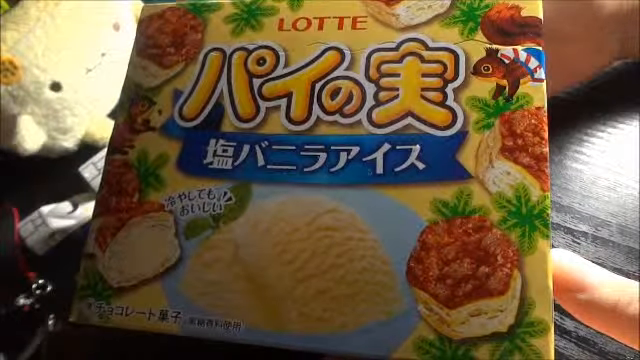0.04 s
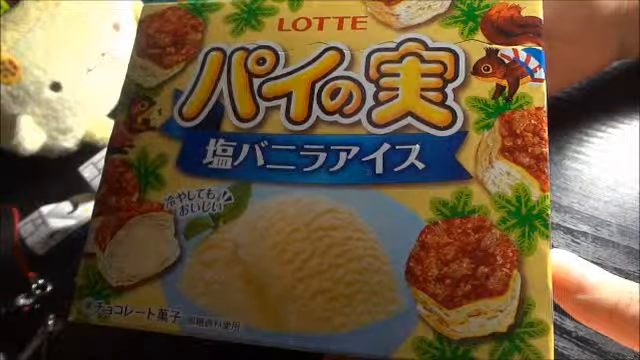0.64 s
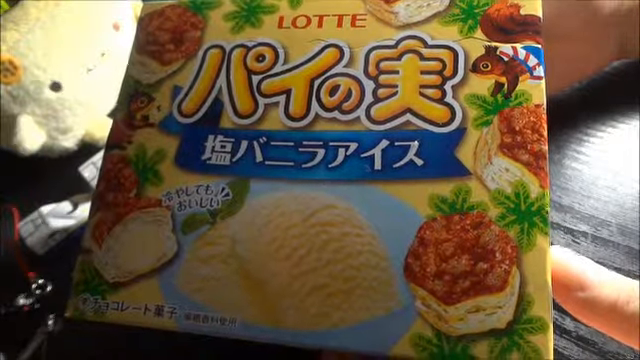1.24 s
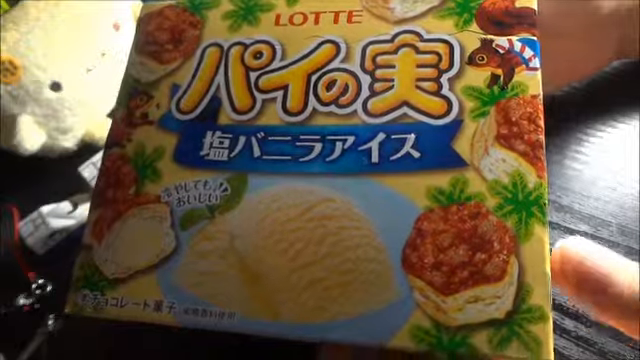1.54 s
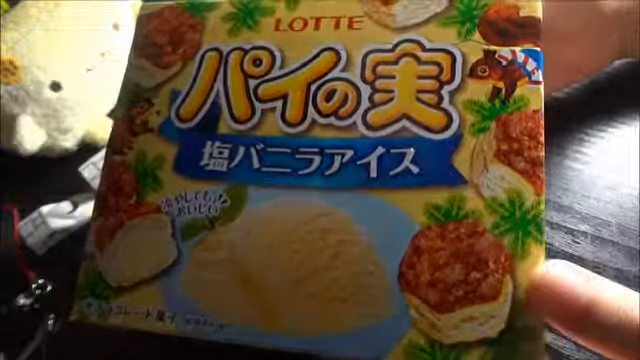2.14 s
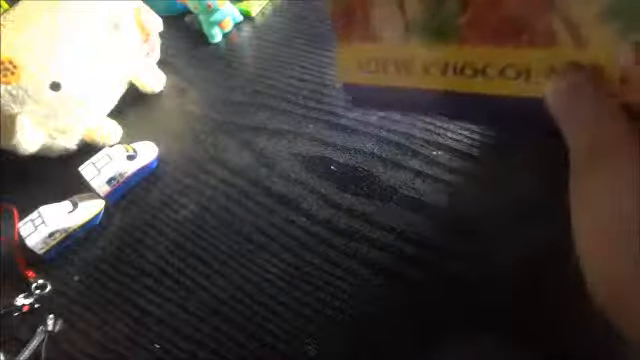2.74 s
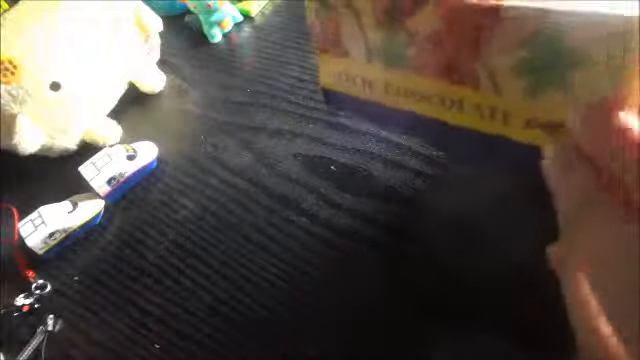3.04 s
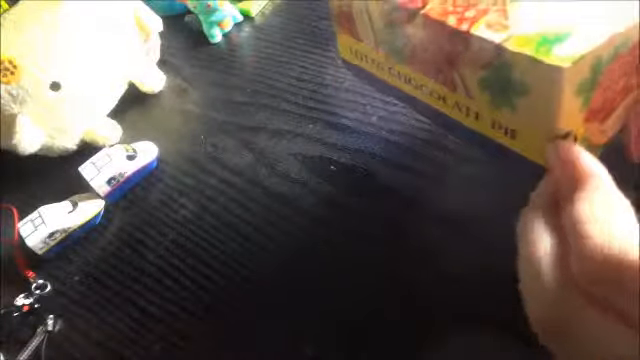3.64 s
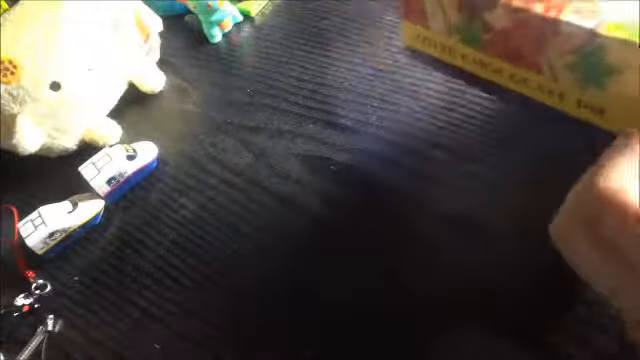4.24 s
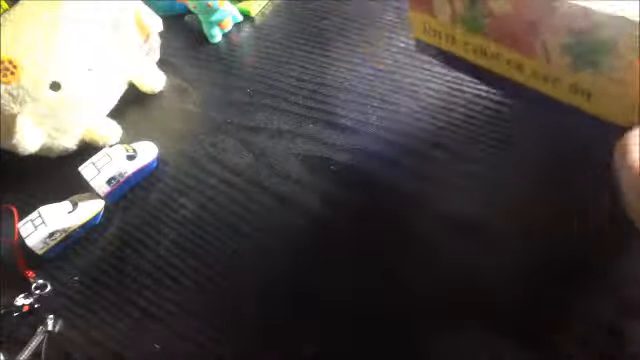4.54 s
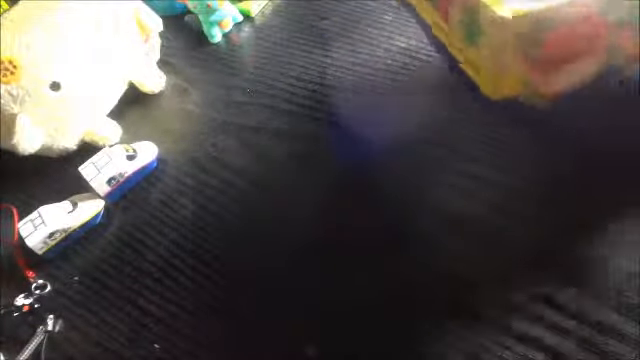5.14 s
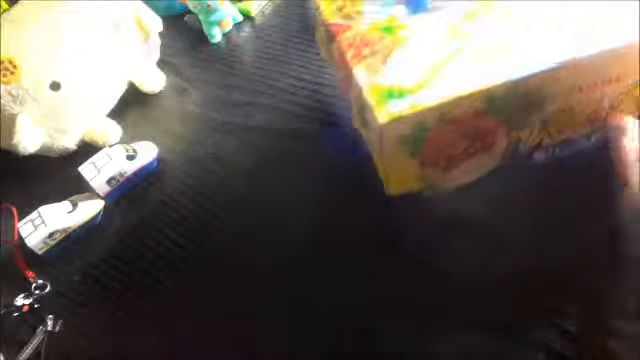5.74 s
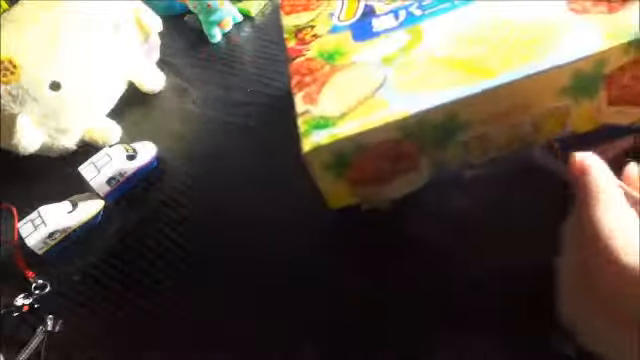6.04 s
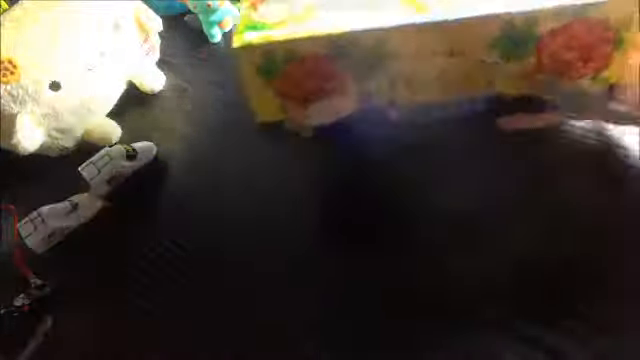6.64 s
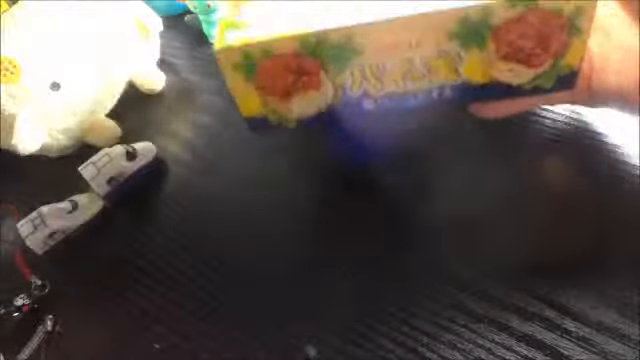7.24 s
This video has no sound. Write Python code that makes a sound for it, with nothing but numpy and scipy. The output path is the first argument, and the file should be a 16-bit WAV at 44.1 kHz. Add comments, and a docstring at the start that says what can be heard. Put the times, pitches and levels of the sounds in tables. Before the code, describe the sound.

A cardboard snack box is tapped, scraped over a table and shaken twice, pastries knocking and rustling in their foil bag.

```python
"""A cardboard snack box is handled close to a small camera, in a small room with steady noise.
It is tilted: pastries shift in their foil bag. From 2.2 s fingers tap the card and the box scrapes over
a table; one sharp click at 3.2 s. From 4.4 s it is shaken: pastries knock on the walls and stir the
foil, and gain control ducks the room noise. Near 6 s skin rubs the card and the box judders on the
table. A second shake follows at 6.4 s; the contents settle under a last rub and a few taps."""
import sys
import numpy as np
from scipy import signal
from scipy.fft import rfft, irfft
from scipy.io import wavfile
from scipy.ndimage import uniform_filter1d

SR = 44100
rng = np.random.default_rng(int(sys.argv[2]) if len(sys.argv) > 2 else 0)


def pcm_store(signal):
    """Save signal as 16-bit PCM."""
    levels = np.round(np.clip(np.atleast_2d(signal), -1, 1) * 32767)
    wavfile.write(sys.argv[1], SR, levels.astype(np.int16).T)


N = 326781
T = np.arange(8192) / SR  # time within one impact [s]

# pastry hits a wall: (time [s], ring level [dB], wall pitch [Hz], crack level [dB], crack centre [Hz])
PASTRY_KNOCKS = [(4.378, -5, 554, -22, 3000), (4.3792, -14, 605, -13, 2860), (4.428, -18, 770, -43, 4000),
                 (4.4524, -10, 647, -26.5, 3760), (4.456, -9, 606, -26, 3950),
                 (4.479, -6.5, 610, -20.5, 3870), (4.5186, -18, 1010, -29, 3500),
                 (4.5327, -18.5, 946, -20, 6100), (4.5495, -12, 880, -16.5, 4930),
                 (4.56, 2, 585, -13, 5030), (4.603, -8.5, 914, -29, 4000), (4.614, -16, 867, -33, 3200),
                 (4.7542, -3.5, 750, -15.5, 3520), (4.767, 1.5, 570, -11.5, 5440),
                 (4.7952, -1.5, 580, -11.5, 4040), (4.809, 7.5, 570, -11.5, 4570),
                 (5.0274, 0, 547, -13, 4850), (5.065, 4.5, 458, -11, 5000), (5.0822, 0, 590, -8.5, 3760),
                 (5.123, 3, 385, -10.5, 4000), (5.1263, -2, 382, -13.5, 4000),
                 (5.1351, 3, 880, -10.5, 4430), (5.1546, 3.5, 670, -12, 3880),
                 (5.1721, 5, 840, -10.5, 4070), (5.2002, 4.5, 575, -11.5, 3550),
                 (5.2351, 2, 840, -9.5, 3400), (6.353, -3.5, 853, -28, 4400),
                 (6.3562, -11, 518, -24.5, 5300), (6.41, 1, 846, -12, 4100), (6.4272, -12, 810, -19, 4100),
                 (6.509, -1.5, 853, -15.5, 6270), (6.572, -11, 705, -20.5, 5550),
                 (6.5871, -.5, 833, -11.5, 4800), (6.6215, 3.5, 820, -12, 4900),
                 (6.6589, 2, 660, -10, 4900), (6.6777, 0, 604, -10, 5360), (6.7164, 1, 790, -10.5, 5240),
                 (6.7368, -2, 796, -7, 4400), (6.7988, -3, 592, -8.5, 3820), (6.8264, -9, 857, -9, 7340),
                 (6.83, -2.5, 575, -13, 4800), (6.8909, -2, 660, -13.5, 4740),
                 (6.9138, -7.5, 435, -18, 7150)]


def amp(db):
    """Decibels to gain."""
    return 10 ** (np.asarray(db) / 20)


def unit(x):
    """Scales to rms 1."""
    return x / np.sqrt(np.mean(x ** 2) + 1e-20)


def read(points, hz):
    """Interpolates a table on a log-frequency axis."""
    f, value = np.transpose(points)
    return np.interp(np.log(hz + 1), np.log(f + 1), value)


def fade(t60_s, t=T):
    """Exponential decay."""
    return np.exp(-np.log(1000) * t / np.maximum(t60_s, 1e-4))


def add(mix, start_s, sound):
    """Mixes a sound in at start_s."""
    part = mix[..., round(start_s * SR):][..., :sound.shape[-1]]
    part += sound[..., :part.shape[-1]]


def coloured(x, spectrum):
    """Filters by a spectrum table; rms 1."""
    return unit(irfft(rfft(x) * amp(read(spectrum, np.fft.rfftfreq(N, 1 / SR))), N))


def grains(per_s, spread_db):
    """Tiny random impacts; spread_db skews their sizes."""
    size = amp(spread_db * np.minimum(rng.exponential(1, N), 4))
    return rng.standard_normal(N) * size * (rng.random(N) < per_s / SR)


def room_noise(level_db=-44, edge_hz=15900):
    """Steady room noise and microphone hiss."""
    # noise spectrum: (frequency [Hz], density [dB])
    spectrum = [(25, -10.5), (70, -6), (130, -4.5), (220, -4), (400, -2.5), (650, -3.5), (1400, -8.5),
                (2000, -13), (4300, -21.5), (9000, -26.5), (15500, -28.5)]
    # left-right likeness: (frequency [Hz], correlation [-1..1])
    likeness = [(25, .7), (60, 1), (180, 0.059), (550, -0.63), (1650, -0.57), (4970, 0.43), (15000, 1)]
    hz = np.fft.rfftfreq(N, 1 / SR)
    left, other = rfft(rng.standard_normal((2, N)))
    same = np.clip(read(likeness, hz), -1, 1)
    ports = np.array([left, same * left + np.sqrt(1 - same ** 2) * other])
    return amp(level_db) * unit(irfft(ports * amp(read(spectrum, hz)) * (hz < edge_hz), N))


def stirred(blows, rise_s, t60_s):
    """Energy that builds and settles after each blow (time [s], level [dB])."""
    t, energy = np.arange(SR) / SR, np.zeros(N)
    settling = ((1 - fade(rise_s, t)) * fade(t60_s, t)) ** 2
    for s, db in blows:
        add(energy, s, amp(db) ** 2 * settling)
    return energy


def swells(rows):
    """Energy of smooth swells (middle [s], length [s], level [dB])."""
    energy = np.zeros(N)
    for middle_s, length_s, db in rows:
        add(energy, middle_s - length_s / 2, (amp(db) * np.hanning(round(length_s * SR))) ** 2)
    return energy


def motion(blows, shifts, lead_s, lead_db, stir_db, rise_s, t60_s):
    """Envelope of the contents: a slide into each blow, settling after it, and other shifts."""
    slides = [(s - lead_s / 4, lead_s, db + lead_db) for s, db in blows]
    return np.sqrt(swells(slides) + amp(stir_db) ** 2 * stirred(blows, rise_s, t60_s) + swells(shifts))


def contents(foil_db=2, tumble_db=-1, creep_db=-41):
    """Foil crinkles and pastries jostle at each tilt and knock; the bag ticks on as it relaxes."""
    # hands tilt the box: (middle [s], length [s], foil level [dB], tumble level [dB])
    tilts = [(.41, 0.17, -68, -54), (1.15, 0.27, -72, -55), (1.7, 1.1, -66, -62.5), (2.63, 0.29, -55, -53),
             (2.847, 0.25, -56.5, -61), (4.123, 0.58, -62, -53), (4.6, 0.15, -42, -28.5),
             (4.69, .18, -47.5, -41), (4.825, 0.19, -37.5, -25.5), (4.93, 0.5, -51, -51),
             (5.138, 0.28, -36, -20.5), (5.36, 0.37, -68, -45), (6.07, 0.66, -56.5, -50),
             (6.41, 0.21, -42, -36), (6.673, 0.21, -38, -23), (7.05, .6, -62, -56)]
    # a fold of the bag buckles: (middle [s], length [s], level [dB])
    crunches = [(4.442, .01, -34.5), (4.552, 0.024, -21), (4.943, .06, -52), (6.399, .016, -37),
                (6.473, .03, -39), (6.884, .04, -35)]
    # foil crinkle: (frequency [Hz], level [dB])
    foil_spectrum = [(400, -12), (1500, -0.5), (4000, -2.5), (6500, -3.5), (9000, -3.5), (11500, -6.5),
                     (16000, -24)]
    # jostling pastries: (frequency [Hz], level [dB])
    tumble_spectrum = [(80, -36), (170, 0), (280, 1), (550, 6), (850, 3.5), (1300, -4), (2200, -14),
                       (5000, -32.5)]
    foil = coloured(grains(per_s=1900, spread_db=2), foil_spectrum)
    tumble = coloured(grains(per_s=2500, spread_db=0), tumble_spectrum)
    ticks = coloured(grains(per_s=110, spread_db=1.5), foil_spectrum)
    cracks = [(s, db) for s, _, _, db, _ in PASTRY_KNOCKS]
    blows = [(s, db) for s, db, *_ in PASTRY_KNOCKS]
    foil_shifts = [(s, length_s, db) for s, length_s, db, _ in tilts] + crunches
    pastry_shifts = [(s, length_s, db) for s, length_s, _, db in tilts]
    foil *= motion(cracks, foil_shifts, lead_s=.03, lead_db=-38, stir_db=-27.5, rise_s=.008, t60_s=.25)
    tumble *= motion(blows, pastry_shifts, lead_s=.05, lead_db=-43.5, stir_db=-24.5, rise_s=.01, t60_s=.2)
    ticks *= np.sqrt(stirred(cracks, rise_s=.05, t60_s=.59))
    return amp(foil_db) * foil + amp(tumble_db) * tumble + amp(creep_db) * ticks


def wall(hz, t60_s, upper_db, lower_db, sag=.11):
    """A card panel flexes: a main mode between two weaker ones; pitch sags as the card relaxes."""
    up, down = rng.uniform(-.12, .12, 2)
    modes = [(hz, 0, t60_s),
             (hz * (1.548 + up), upper_db, t60_s * .74),
             (hz * (.57 + down / 2), lower_db, t60_s * .64)]
    bent_s = np.cumsum(1 + sag * (fade(.027) - .5)) / SR
    ring = -sum(amp(db) * fade(decay_s) * np.sin(2 * np.pi * f * bent_s) for f, db, decay_s in modes)
    # a small panel radiates little below its modes
    return signal.lfilter(*signal.butter(2, min(hz * .47, 2000), "high", fs=SR), ring)


def snap(spectrum_db, crumble, crumble_t60_s):
    """A force spike and a brief crunch; rms 1 over the first 2 ms."""
    force = crumble * rng.standard_normal(len(T)) * fade(crumble_t60_s)
    force[0] = -1
    log_gain = np.log(amp(np.r_[spectrum_db, spectrum_db[-2:0:-1]]))
    pulse = np.fft.ifft(np.exp(np.conj(signal.hilbert(log_gain)))).real  # minimum phase
    sound = signal.fftconvolve(force, pulse)[:len(T)]
    return sound / np.sqrt(np.mean(sound[:round(.002 * SR)] ** 2))


def crack(centre_hz, focus_db=4, max_cut_db=9):
    """Hard contact: the sharper the edge, the higher the centre."""
    # contact spectrum: (frequency [Hz], level [dB])
    spectrum = [(30, -27), (150, -34), (400, 4), (1400, 20.5), (2200, 10), (3000, 6), (4300, 4), (6200, 0),
                (8700, 3.5), (11500, -4), (16000, -9)]
    hz = np.fft.rfftfreq(len(T), 1 / SR)
    octaves = np.log2(np.maximum(hz, 1500) / centre_hz)
    cut_db = np.minimum(focus_db * octaves ** 2, max_cut_db)
    return snap(read(spectrum, hz) - cut_db, crumble=.27, crumble_t60_s=.014)


def taps(t60_s=.022):
    """Fingertips and box edges tap lightly; the card rings briefly."""
    # taps: (time [s], ring level [dB], wall pitch [Hz], crack level [dB], crack centre [Hz])
    touches = [(2.1985, -27.5, 227, -35.5, 2440), (2.325, -23, 620, -42, 3000),
               (2.3695, -31, 610, -30, 4900), (2.4212, -27, 376, -30.5, 5000),
               (2.521, -32.5, 1040, -32.5, 5300), (2.599, -42, 755, -38, 4600),
               (2.62, -43, 745, -36.5, 5000), (2.7831, -38, 800, -34, 4370), (3.871, -27, 544, -44.5, 4400),
               (4.006, -24, 590, -41.5, 2200), (4.128, -31.5, 514, -38.5, 2500),
               (4.186, -32, 627, -40, 4580), (4.301, -39, 550, -43, 8000), (5.456, -30, 790, -41.5, 3000),
               (6.041, -28.5, 315, -58, 4900), (6.28, -26, 800, -44, 4100), (7.191, -33, 570, -48, 4200),
               (7.344, -22.5, 980, -33, 3900), (7.361, -28.5, 644, -41, 2870)]
    out = np.zeros(N)
    for s, wall_db, hz, crack_db, centre_hz in touches:
        add(out, s, amp(wall_db) * wall(hz, t60_s, upper_db=-14.5, lower_db=-11))
        add(out, s, amp(crack_db) * crack(centre_hz))
    return out


def push(start_s, length_s, t60_s, rise_s=.037):
    """Envelope: the hand gets the box moving, holds, lets it run out."""
    t = np.arange(N) / SR - start_s
    return np.clip(t / rise_s, 0, 1) * fade(t60_s, np.maximum(t - length_s, 0))


def slide(drum_gain_db=-1, flat_share=.46):
    """Card catches on wood grain: a gritty scrape, with low drumming while the box lies flat."""
    # pushes: (start [s], length [s], drum level [dB], drag level [dB], scrape level [dB])
    pushes = [(2.239, .17, -31.5, -37, -39.5), (2.864, .035, -64, -49.5, -53.5)]
    # box drumming: (frequency [Hz], level [dB])
    drum_spectrum = [(90, -25), (150, -8), (212, 6.5), (265, -7), (330, 2.5), (450, -12), (1200, -46)]
    # midrange drag: (frequency [Hz], level [dB])
    drag_spectrum = [(150, -7), (400, -9), (540, 2.5), (720, 3), (1100, -9.5), (2200, -14.5), (5000, -29)]
    # bright scrape: (frequency [Hz], level [dB])
    scrape_spectrum = [(700, -11), (2000, -5), (3100, -2), (5000, -6), (7300, -6), (10000, -16.5),
                       (15000, -50)]
    drum = amp(drum_gain_db) * coloured(rng.standard_normal(N), drum_spectrum)
    drag = coloured(grains(per_s=900, spread_db=-1), drag_spectrum)
    # each catch is a tiny noise burst
    catches = signal.oaconvolve(grains(per_s=2200, spread_db=2.2) ** 2, fade(.003))[:N]
    scrape = coloured(np.sqrt(abs(catches)) * rng.standard_normal(N), scrape_spectrum)
    out = np.zeros(N)
    for s, length_s, drum_db, drag_db, scrape_db in pushes:
        out += amp(drum_db) * drum * push(s, flat_share * length_s, t60_s=.55)
        out += (amp(drag_db) * drag + amp(scrape_db) * scrape) * push(s, length_s, t60_s=.62)
    return out


def click(time_s=3.2401, level_db=-23.5):
    """A small stiff part snaps once, bright and dry."""
    # click spectrum: (frequency [Hz], level [dB])
    spectrum = [(200, -7), (1000, -6), (2200, -14), (2650, 3), (3400, -13), (4250, 2.5), (5400, -4.5),
                (8500, -3.5), (12000, -4), (16000, -10)]
    out = np.zeros(N)
    spectrum_db = read(spectrum, np.fft.rfftfreq(len(T), 1 / SR))
    add(out, time_s, amp(level_db) * snap(spectrum_db, crumble=.11, crumble_t60_s=.012))
    return out


def clatter(count=12, t60_s=.016):
    """Lesser modes of card and pastry, different at each point of contact."""
    hz = 380 * 5 ** ((np.arange(count) + rng.random(count)) / count)[:, None]
    size = rng.choice([-1, 1], (count, 1)) * rng.uniform(.62, 1, (count, 1))
    modes = (size * np.cos(2 * np.pi * hz * T)).sum(0) / np.linalg.norm(size)
    return modes * fade(t60_s) * (1 - fade(.0016))


def knocks(ring_gain_db=-1, crack_gain_db=3, clatter_db=-5, lead_db=-15, lead_s=.0056):
    """A pastry cracks against the card and rings the wall; a brief rising hiss leads into each crack."""
    # wall damping by the grip: (start [s], t60 of a 0 dB blow [s])
    grips = [(4.37, .021), (4.74, 0.02), (6.34, .023), (6.56, 0.0242)]
    lead_band = signal.butter(2, [2500, 11000], "band", fs=SR)
    out = np.zeros(N)
    for s, wall_db, hz, crack_db, centre_hz in PASTRY_KNOCKS:
        _, grip_t60_s = grips[sum(s >= start_s for start_s, _ in grips[1:])]
        t60_s = grip_t60_s * 2 ** (-wall_db / 13.5)  # 13.5 dB softer rings twice as long
        lead_hiss = unit(signal.lfilter(*lead_band, rng.standard_normal(round(lead_s * SR))))
        add(out, s - lead_s, amp(crack_db + lead_db) * lead_hiss * np.linspace(0, 1, len(lead_hiss)))
        add(out, s, amp(crack_db + crack_gain_db) * crack(centre_hz))
        ring = wall(hz, t60_s, upper_db=-14.5, lower_db=-9.5) + amp(clatter_db) * clatter()
        add(out, s, amp(wall_db + ring_gain_db) * ring)
    return out


def thuds(hz=80, t60_s=.081):
    """A dull low thud as the box bumps the table."""
    # bumps on the table: (time [s], level [dB])
    bumps = [(4.379, -30), (4.56, -31.5), (6.587, -40), (6.914, -34)]
    out = np.zeros(N)
    for s, db in bumps:
        add(out, s, amp(db) * fade(t60_s) * np.sin(2 * np.pi * hz * T))
    return out


def rubs(q=7):
    """Skin slides on glossy card: a narrow, swelling hiss."""
    # finger strokes: (middle [s], length [s], centre [Hz], level [dB])
    strokes = [(6.069, .5, 2550, -56), (6.091, .4, 13600, -56), (7.091, .17, 7440, -50.5)]
    out = np.zeros(N)
    for middle_s, length_s, hz, db in strokes:
        hiss = signal.lfilter(*signal.iirpeak(hz, q, fs=SR), rng.standard_normal(round(length_s * SR)))
        add(out, middle_s - length_s / 2, amp(db) * unit(hiss) * np.hanning(len(hiss)))
    return out


def judder(highpass_hz=190, gain_db=2, buzz_hz=920, buzz_db=-19):
    """Stick-slip on the table: each slip is a soft, low thump of the whole box."""
    # slips: (time [s], level [dB], pitch [Hz])
    slips = [(6.1227, -17.5, 273), (6.132, -17.5, 307), (6.1437, -11, 277), (6.1518, -14, 272),
             (6.164, -10, 293), (6.1803, -11.5, 323)]
    buzz = amp(buzz_db) * fade(.022) * np.sin(2 * np.pi * buzz_hz * T)
    out = np.zeros(N)
    for s, db, hz in slips:
        thump = wall(hz, t60_s=.022, upper_db=-8, lower_db=-22) + amp(-25) * clatter() + buzz
        add(out, s, amp(db + gain_db) * thump * (1 - fade(.006)))
    return signal.lfilter(*signal.butter(5, highpass_hz, "high", fs=SR), out + 1e-18)


def resonances(x, ring_db=-52, highpass_hz=192):
    """Faint resonances ring on after each blow; the box is too light to give bass."""
    # faint resonances: (frequency [Hz], level [dB], t60 [s])
    modes = [(286.3, -5, 0.17), (357.6, -7, 0.13), (427, -25, 0.15), (488, -1.5, 0.13), (589, -9.5, 0.12),
             (664.6, -16, 0.11), (777, -6, 0.13), (854, -4, 0.16), (1033.5, 5, 0.098), (1162, 4.5, 0.06),
             (1544, -6.5, 0.084)]
    ring = sum(amp(db) * fade(t60_s) * np.cos(2 * np.pi * hz * T) for hz, db, t60_s in modes)
    rung = x + amp(ring_db) * signal.fftconvolve(x, ring)[:N]
    return signal.lfilter(*signal.butter(3, highpass_hz, "high", fs=SR), rung)


def reflections(x, wet_db=-11.5, side_db=-7.5):
    """Dense small-room echoes from one position, partly different at the two microphone ports."""
    # room decay: (frequency [Hz], t60 [s])
    decay = [(150, 0.23), (500, 0.16), (1400, 0.16), (3700, 0.2), (9700, 0.22), (16000, 0.064)]
    # echo spectrum: (frequency [Hz], level [dB])
    spectrum = [(60, -4), (250, 7), (800, 3.5), (2000, 6.5), (4500, 0.5), (9000, 0), (16000, 0)]
    t = np.arange(SR // 3) / SR
    onset = np.clip(t / .006 - .5, 0, 1)
    echoes = rng.standard_normal((2, len(t))) * (rng.random((2, len(t))) < .12) * onset
    hz, frame_s, bands = signal.stft(echoes, SR, nperseg=256)
    bands = bands * fade(read(decay, hz)[:, None], frame_s) * amp(read(spectrum, hz))[:, None]
    tails = signal.istft(bands, SR, nperseg=256)[1]
    tails /= np.linalg.norm(tails, axis=1, keepdims=True)
    mid, side = signal.oaconvolve(x[None], tails, axes=1)[:, :N]
    return amp(wet_db) * np.array([mid + amp(side_db) * side, mid - amp(side_db) * side])


def room(x, patterns=3, cycle_s=.115):
    """The box keeps moving, so its echoes crossfade from one pattern to the next."""
    turns = np.arange(N) / SR / cycle_s
    shares = [np.maximum(np.cos(2 * np.pi * (turns - k / patterns)), 0) for k in range(patterns)]
    total = np.linalg.norm(shares, axis=0)
    return sum(reflections(x * share / total) for share in shares)


def near_bounces(x, side_db=-17):
    """Bounces off table and hands reach the two ports differently, mainly in the treble."""
    scatter = np.diff(rng.standard_normal(len(T)) * fade(.004))
    side = amp(side_db) * signal.fftconvolve(x, scatter / np.linalg.norm(scatter))[:N]
    return np.array([side, -side])


def scene(click_echo_db=-5):
    """The handled box in its room; the click is close, so it has less echo."""
    handling = resonances(contents() + taps() + slide() + knocks()) + thuds() + rubs() + judder()
    tick = click()
    direct = handling + tick
    return room_noise() + direct + room(handling + amp(click_echo_db) * tick) + near_bounces(direct)


def record(dry, threshold_db=-21, cut_db_per_db=.47, recover_db_per_s=5.5, edge_hz=16150):
    """Gain control drops fast and recovers slowly; then soft clipping and a lowpass."""
    power_db = 10 * np.log10(abs(uniform_filter1d((dry ** 2).mean(0), size=1300)) + 1e-12)
    recovery_db = recover_db_per_s * np.arange(N) / SR
    held_db = np.maximum.accumulate(power_db + recovery_db) - recovery_db
    over_db = np.maximum(held_db - threshold_db, 0)
    cut_db = cut_db_per_db * signal.lfilter([1 / 900], [1, 1 / 900 - 1], over_db)  # 20 ms attack
    ducked = dry * amp(-cut_db)
    rounded = ducked / (1 + ducked ** 4) ** (1 / 4)
    lowpass = signal.firwin(255, edge_hz, window=("kaiser", 9), fs=SR)
    return signal.oaconvolve(rounded, lowpass[None], "same")


dry = scene()
out = record(dry)
pcm_store(out)
```